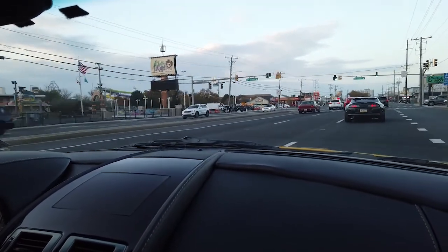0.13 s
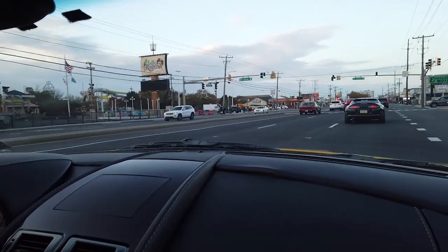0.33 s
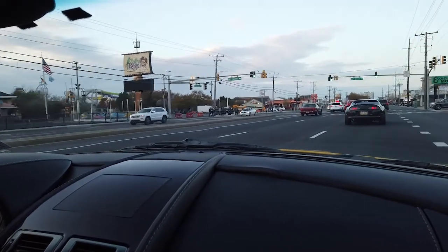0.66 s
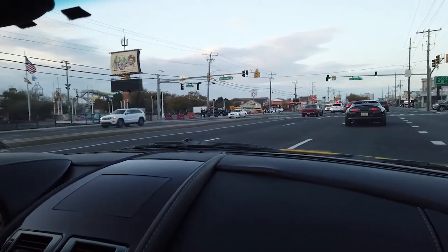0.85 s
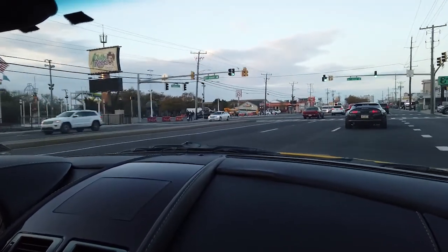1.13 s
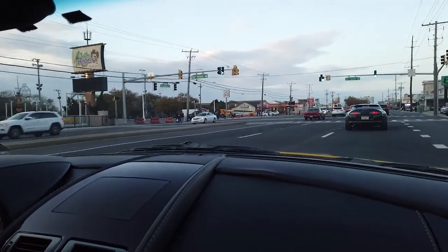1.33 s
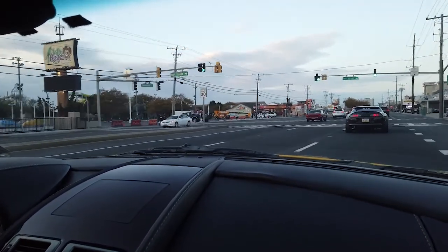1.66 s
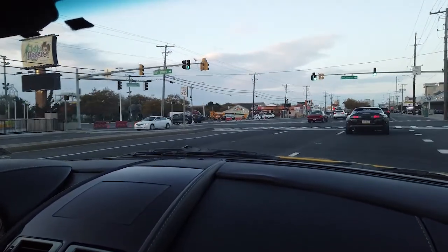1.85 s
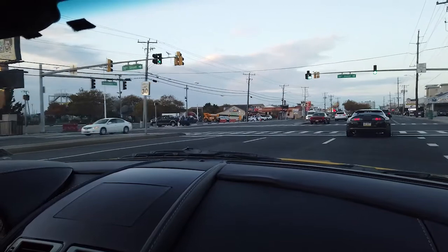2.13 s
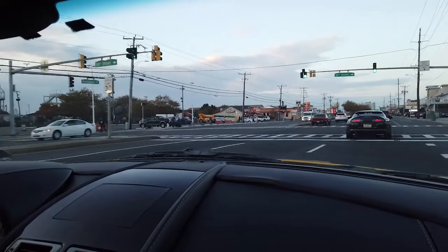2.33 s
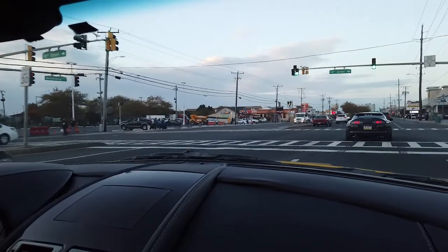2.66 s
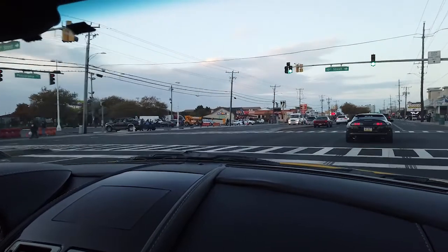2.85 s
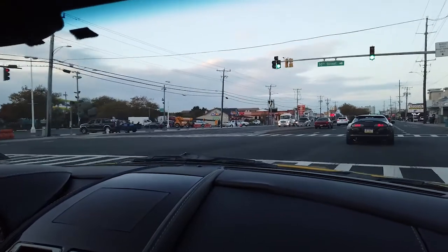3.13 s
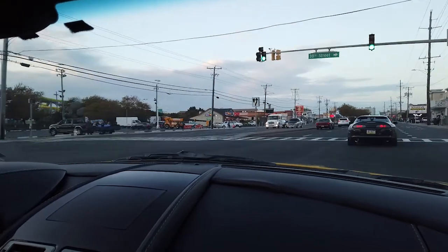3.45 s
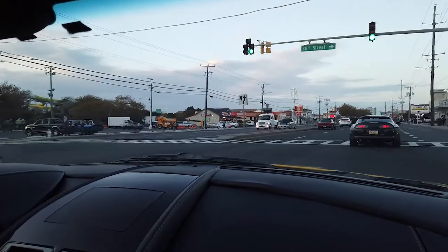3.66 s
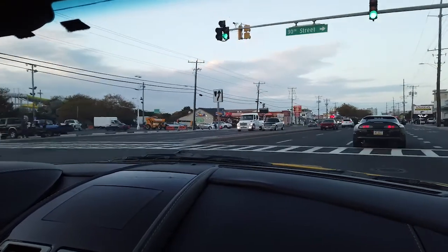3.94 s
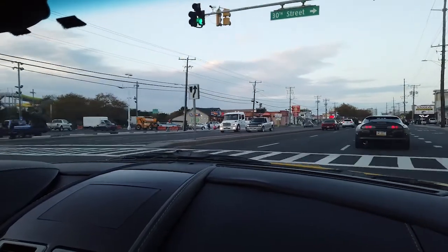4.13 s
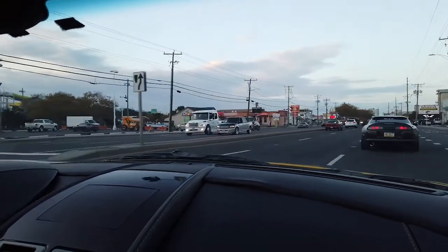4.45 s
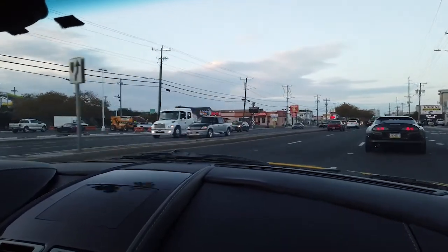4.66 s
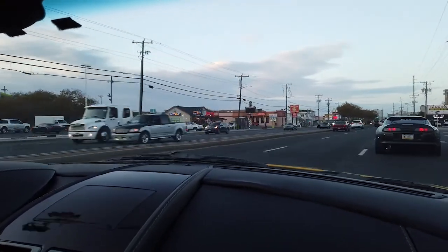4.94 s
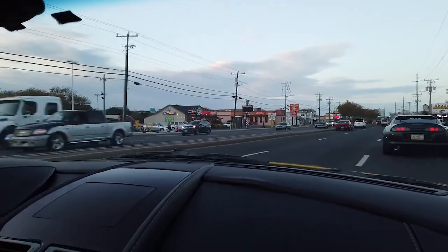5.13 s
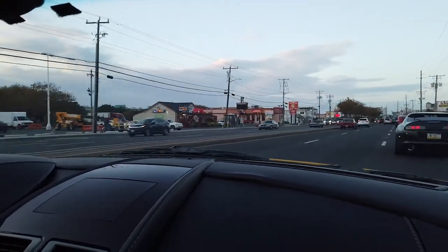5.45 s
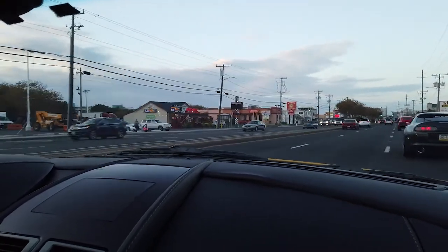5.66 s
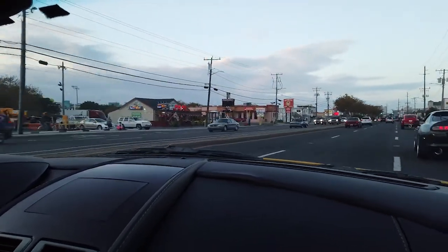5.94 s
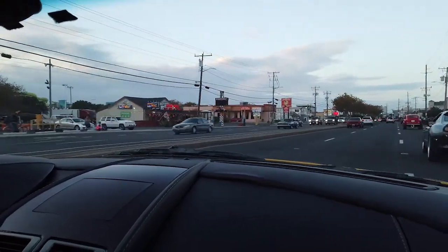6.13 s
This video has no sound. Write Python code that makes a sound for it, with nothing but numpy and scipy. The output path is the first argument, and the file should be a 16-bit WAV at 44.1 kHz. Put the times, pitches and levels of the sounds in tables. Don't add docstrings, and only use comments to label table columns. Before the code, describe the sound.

Inside a moving car, steady low road rumble and engine hum, with another car's exhaust droning ahead and body thumps over rough joints.

```python
import sys
import numpy as np
from scipy import signal
from scipy.fft import rfft, irfft, next_fast_len
from scipy.io import wavfile
from scipy.ndimage import uniform_filter1d

SR = 44100
rng = np.random.default_rng(int(sys.argv[2]) if len(sys.argv) > 2 else 0)


def unload_audio(sound):
    columns = np.transpose(np.atleast_2d(sound))
    steps = np.round(np.clip(columns, -1, 1) * 32767)
    wavfile.write(sys.argv[1], SR, steps.astype(np.int16))


def volts_from_decibels(level):
    exponent = np.asarray(level, float) / 20
    return 10 ** exponent


N = 277389
T = np.arange(N) / SR
SIZE = next_fast_len(N)
HZ = np.fft.rfftfreq(SIZE, 1 / SR)

# time_s, cycle_rate_hz
ENGINE_SPEED = [(0.0, 20.05), (2.1, 20.04), (2.8, 19.97), (3.3, 20.11), (3.6, 20.3), (4.2, 20.94),
                (4.8, 21.48), (5.4, 21.88), (6.29, 21.9)]
# time_s, load_above_cruising_db
ENGINE_LOAD = [(0, -3), (.5, -1), (3.0, -1), (3.6, 9), (4.2, 10), (5.1, 8.5), (5.8, 1.5), (6.29, -3)]
# order, level_db
ORDER_LEVELS = [(2, 5.5), (3, -0.5), (5, 1.5), (6, -9), (8, -0.5), (9, -5.5), (10, -13), (11, -4.5),
                (12, -15.5), (13, 0.5), (14, -9), (15, -5), (16, 1), (20, -11)]
REFERENCE_ORDERS = [5, 8, 11, 13, 16]
# cruising_db, load_share, speed_up_db_per_hz
ORDER_PATHS = [(-48.5, -1.7, -5), (-48, 1.18, -1), (-48.5, 1.4, -2.5), (-49.5, 1.27, -9), (-64, 0.83, 7.5)]

# time_s, firing_rate_hz
AHEAD_SPEED = [
    [(0.0, 152.2), (0.3, 152.4), (0.75, 150.3)],
    [(1.7, 139.9), (2.09, 142.6), (2.6, 142.2), (3.8, 142.8), (4.6, 143.7), (5.2, 144.0), (6.29, 144.96)],
]
# time_s, firing_tone_db, overtone_rasp_db
AHEAD_EFFORT = [
    [(0, -35.5, -3), (.25, -47.5, 1.5), (.5, -35.5, -14), (.62, -42.5, -6), (.75, -50, -10)],
    [(1.7, -49, 1), (1.95, -33, -5), (2.1, -26.5, 5), (2.45, -32, -4), (2.74, -26, -1), (2.88, -31, 7),
     (3.1, -31, 5), (3.35, -30.5, 2), (3.58, -26, -1), (4.05, -32, -3), (4.3, -29, -2), (4.45, -26.5, -2.5),
     (4.82, -27.5, 8), (5.1, -27.5, -10.5), (5.36, -32, 2), (5.85, -25.5, 3.5), (6.0, -25.5, -3),
     (6.2, -29, 6)],
]
SECOND_PARTIAL_DB = [-16.5, -31.5]
# time_s, level_db
THIRD_PARTIAL = [
    [(0, -49), (.1, -53), (.25, -51), (.4, -46), (.5, -49.5), (.62, -60), (.75, -73)],
    [(1.9, -70.5), (2.1, -45.5), (2.22, -56.5), (2.5, -52), (2.75, -67.5), (3.05, -47.5), (3.38, -58.5),
     (3.5, -47), (3.75, -51.5), (3.92, -61.5), (4.4, -60), (4.75, -51), (4.97, -65), (5.12, -52.5),
     (5.45, -51), (5.62, -59), (5.85, -46.5), (6.0, -54), (6.15, -45)],
]
FOURTH_PARTIAL = [
    [(0, -54), (.2, -54.5), (.45, -51.5), (.56, -55), (.64, -68)],
    [(1.75, -65), (2.15, -50), (2.3, -60), (2.4, -48.5), (2.58, -55), (2.75, -47), (2.92, -54),
     (3.1, -53.5), (3.2, -45), (3.38, -58), (3.5, -52.5), (4.08, -51), (4.2, -56.5), (4.8, -49.5),
     (5.2, -55), (5.32, -60), (5.8, -46.5), (6.29, -50.5)],
]

# time_s, unevenness_db, coarseness_db
ROAD_SURFACE = [(0, -2, -1), (.6, -3.5, 0), (1.2, -0.5, 1), (1.7, -3.5, 0), (2.3, 1.5, 2), (2.6, -4.5, 2),
                (3.0, 1, 1.5), (3.4, -0.5, 2), (3.7, 5.5, -2), (4.0, 12.5, -3.5), (4.2, 0, -3.5),
                (4.45, -4.5, -2), (4.7, 8.5, -1.5), (5.1, 0.5, -1.5), (5.5, -3.5, -0.5), (5.9, -4, -1.5),
                (6.29, -3.5, -1.5)]
ROAD_PARTS_HZ = [45, 110, 400, 850, 1700, 3600]
# frequency_hz, level_db_per_hz
CABIN_COLOUR = [(12, -2), (24, 3.5), (42, 7.5), (68, -11), (105, -10.5), (200, -19), (310, -24),
                (500, -29.5), (830, -28), (1150, -37), (1450, -36.5), (2100, -41.5), (3500, -56.5),
                (5200, -65.5)]
# centre_hz, width_hz, lift_db
ROAR_PANELS = [(750, 20, 5.5), (842, 28, 4), (938, 30, 6.5), (1434, 110, 5), (2100, 18, 1), (2710, 49, 3.5)]
# frequency_hz, side_minus_mid_db
FIELD_WIDTH = [(40, -38), (90, -31), (220, -14.5), (340, -17), (520, -24), (800, -13), (1900, -14),
               (3000, 0), (6000, -9)]
# time_s, roar_lift_db
TYRE_SLAPS = [
    (2.199, 0),
    (2.519, 2),
    (3.25, 2),
    (4.585, 7),
    (4.745, 8.5),
]

# start_s, peak_db, body_hz, t60_s
ROAD_JOINTS = [(.11, -24, 40.8, 0.25), (.805, -26, 40, 0.29), (1.195, -26.5, 45, 0.27),
               (1.69, -26.5, 45, 0.24), (2.21, -27, 49, 0.18), (2.287, -20.5, 45, 0.29),
               (2.409, -25.5, 45.8, 0.34), (2.954, -24, 45, 0.28), (3.04, -27, 47.7, 0.23),
               (3.183, -24.5, 50.5, .2), (3.548, -19, 42.4, 0.26), (3.716, -13.5, 51, 0.36),
               (3.835, -19, 55, .2), (3.91, -17.5, 32, .3), (3.95, -15.5, 36, .25),
               (3.991, -13.5, 48, 0.19), (4.05, -14.5, 45.6, .25), (4.435, -20.5, 42, .25),
               (4.583, -11.5, 44.4, 0.53), (4.705, -26, 48, 0.22), (4.768, -14.5, 42, 0.19),
               (4.845, -27.5, 45, 0.14), (5.025, -19, 43.3, .3), (5.434, -28, 39.9, 0.26),
               (5.731, -24, 43.8, .15), (5.9, -19.5, 42.8, 0.34), (6.09, -21, 42, 0.24),
               (6.175, -19.5, 38.3, 0.14)]
# start_s, peak_db, pitch_hz
PANEL_KNOCKS = [(0.88, -34.5, 922), (1.134, -32, 745), (1.232, -37, 830), (1.257, -37, 790),
                (1.343, -33, 851), (2.157, -37, 743), (2.197, -31, 842), (2.347, -31, 860),
                (2.405, -33, 850), (2.511, -36, 763), (2.523, -28.5, 834), (2.546, -31, 936),
                (2.56, -31, 923), (2.58, -30.5, 840), (2.613, -34.5, 796), (2.663, -32, 908),
                (2.701, -35.5, 892), (2.744, -39.5, 786), (2.767, -43.5, 821), (2.806, -32, 835),
                (2.861, -38.5, 912), (2.903, -42, 930), (3.179, -40, 857), (3.216, -31.5, 734),
                (3.262, -37, 814), (3.304, -37, 704), (3.354, -36, 742), (4.584, -37.5, 860),
                (4.708, -36.5, 743), (4.737, -26.5, 725)]
# centre_s, peak_db,
# pitch_hz, length_s
SHORT_TONES = [(.38, -50, 770, .3), (2.08, -47, 856, .2), (0.57, -47, 435, .06), (2.18, -48, 395, .11),
               (3.19, -41, 580, .03), (3.24, -42, 620, .025), (3.32, -44, 600, .02),
               (3.445, -45, 880, .025), (3.815, -47.5, 1450, .066), (4.552, -45, 900, .012),
               (4.572, -41, 1310, .018), (4.59, -47, 1500, .012), (4.61, -38, 225, .12),
               (4.785, -44, 920, .015), (4.78, -43, 550, .02), (5.533, -50.5, 1450, .05),
               (5.657, -59, 3020, .017), (5.69, -60, 3320, .024), (5.86, -59, 3450, .02),
               (5.994, -49, 1450, .05)]
# time_s, level_db
CREAK_LEVEL = [(0, -85.5), (4.9, -87.5), (5.3, -78.5), (5.65, -71), (6.05, -69), (6.29, -67)]
# peak_s, peak_db, rise_s, t60_s, dull_share
TRIM_TICKS = [(2.127, -56, 0.0017, .05, 0.1), (2.906, -59.5, 0.0034, .04, .9),
              (2.915, -46.5, 0.004, 0.05, 0.97), (2.921, -55.5, .003, 0.03, 0.98),
              (3.032, -61.5, 0.0098, .06, .1), (3.041, -40.5, 0.002, 0.044, 0.1), (3.05, -55, .003, .1, .1),
              (3.075, -63, 0.0092, 0.13, 0.2), (3.323, -70.5, 0.0022, 0.046, 1),
              (3.719, -63, 0.0024, .05, 0.9), (4.381, -62, 0.0016, 0.068, 0.7),
              (4.716, -68.5, .002, 0.078, 0.8), (5.022, -61, 0.012, 0.13, 0.03),
              (5.035, -44, .0025, .035, .05), (5.04, -48, 0.0033, 0.082, .05),
              (5.052, -56, 0.0036, .16, .05), (5.64, -74, 0.048, 0.25, 0.2), (5.94, -72, .03, 0.25, 0.04)]
# centre_hz, width_hz, level_db
BRIGHT_MODES = [(1900, 1700, 2), (4150, 700, -4.5), (5100, 560, -6.5), (6130, 890, -0.5), (7400, 1500, -5),
                (8800, 880, 0.5), (10500, 910, 4.5), (12730, 1400, -2.5), (15000, 1400, -2)]
DULL_MODES = [(3500, 250, 4.5), (4140, 510, 0.5), (5900, 500, -5), (7500, 350, -2.5), (9700, 400, 2.5),
              (10700, 360, -1.5), (11500, 350, 0.5)]
CLOTH_MODES = [(4470, 2500, -8), (7930, 2700, -5.5), (10340, 900, 3.5), (12760, 1500, -3),
               (14800, 2000, -1.5)]
# time_s, level_db
AIR_LEVEL = [(0.0, -75), (1.4, -77.5), (3.24, -79.5), (3.9, -81.5), (5.1, -82), (5.73, -76.5), (6.29, -78)]
# frequency_hz, level_db_per_hz
AIR_COLOUR = [(3500, -7), (5000, 2), (6500, -3.5), (8500, -5), (9700, -7.5), (11400, -6.5), (12300, -12),
              (13200, -17), (16000, -28)]


def shape(points, hz):
    f, db = np.transpose(points)
    return np.interp(np.log(np.maximum(hz, 1)), np.log(f), db)


def colour(x, gain):
    return irfft(rfft(x, SIZE) * gain, SIZE)[:N]


def unit(x):
    return x / np.sqrt(np.mean(x ** 2))


def walk(rate):
    steps = np.repeat(rng.standard_normal(int(N * rate / SR) + 2), 16)
    smooth = uniform_filter1d(uniform_filter1d(steps, size=16), size=16)
    return 1.65 * np.interp(T * rate * 16, np.arange(len(smooth)), smooth)


def curves(table):
    time_s, *columns = np.transpose(table)
    return [np.interp(T, time_s, column) for column in columns]


def between(x, marks):
    steps = np.arange(len(marks))
    return np.clip(1 - np.abs(np.interp(x, marks, steps) - steps), 0, 1)


def resonances(modes):
    return sum(volts_from_decibels(db) / (1 + (2 * (HZ - hz) / width) ** 2) for hz, width, db in modes)


def ports(x, lag_s):
    turn = np.exp(1j * np.pi * HZ * lag_s)
    return np.array([colour(x, turn), colour(x, 1 / turn)])


def partial(phase, db, shimmer_db, rough):
    level = volts_from_decibels(db + shimmer_db * walk(14))
    start = 2 * np.pi * rng.random()
    return np.sqrt(2) * level * np.sin(phase + rough * walk(22) + start)


def engine():
    cruise_hz = 20
    hz, load = curves(ENGINE_SPEED)[0], curves(ENGINE_LOAD)[0]
    reference_db = np.array([db + share * load + slope * (hz - cruise_hz) for db, share, slope in ORDER_PATHS])
    phase = 2 * np.pi * np.cumsum(hz) / SR
    out = 0
    for order, db in ORDER_LEVELS:
        order = round(order)
        level_db = between(order, REFERENCE_ORDERS) @ reference_db + db
        out = out + partial(order * phase, level_db, shimmer_db=2.6, rough=.4)
    return out


def car_ahead():
    fade_s = .05
    out = 0
    pulls = zip(AHEAD_SPEED, AHEAD_EFFORT, SECOND_PARTIAL_DB, THIRD_PARTIAL, FOURTH_PARTIAL)
    for speed, effort, second_db, third, fourth in pulls:
        tone, rasp = curves(effort)
        levels = [tone, tone + rasp + second_db, curves(third)[0], curves(fourth)[0]]
        phase = 2 * np.pi * np.cumsum(curves(speed)[0]) / SR
        since_start = T - speed[0][0] + fade_s
        until_end = speed[-1][0] + fade_s - T
        on = np.clip(np.minimum(since_start, until_end) / fade_s, 0, 1)
        for k, db in enumerate(levels):
            out = out + on * partial((k + 1) * phase, db, shimmer_db=.6 + .3 * k, rough=.14 + .22 * k)
    return out


def road():
    slap_s, shakes_per_s = .03, 21
    uneven, coarse = curves(ROAD_SURFACE)
    slaps = sum(db * np.exp(-((T - s) / slap_s) ** 2) for s, db in TYRE_SLAPS)
    boom = -3.5 + .45 * uneven + 2 * walk(shakes_per_s)
    drum = 0.82 * uneven + 1.5 * walk(shakes_per_s)
    roar = coarse + slaps + 0.5 * walk(shakes_per_s)
    hiss = coarse
    below_roar = 0.16 * drum + 0.13 * roar
    above_roar = 0.3 * roar + 0.28 * hiss
    swing = np.array([boom, drum, below_roar, roar, above_roar, hiss])

    panels_db = sum(db / (1 + (2 * (HZ - hz) / width) ** 2) for hz, width, db in ROAR_PANELS)
    treble_loss_db = 35 * np.log10(1 + (HZ / 7000) ** 4)
    gain = volts_from_decibels(shape(CABIN_COLOUR, HZ) + panels_db - treble_loss_db)
    mid, side = rfft(rng.standard_normal((2, SIZE))) * gain
    out = 0
    for centre in 14 * 2 ** np.arange(0, 10, .5):
        octaves = np.log2(np.maximum(HZ, 1) / centre)
        band = np.cos(np.pi * np.clip(octaves, -.5, .5)) ** 2
        share = between(np.log(centre), np.log(ROAD_PARTS_HZ))
        level = volts_from_decibels(share @ swing + 0.61 * walk(9))
        pair = np.array([mid, side * volts_from_decibels(shape(FIELD_WIDTH, centre))])
        out = out + level * irfft(band * pair, SIZE)[:, :N]
    return volts_from_decibels(-29.0) * out / np.sqrt(np.mean(out[0] ** 2))


def joints():
    out = np.zeros(N)
    for s, db, hz, t60 in ROAD_JOINTS:
        t = np.maximum(T - s, 0)
        swell = 1 - np.exp(-t / 0.0017)
        out += volts_from_decibels(db - 60 * t / t60) * swell * np.sin(2 * np.pi * hz * t)
    return out


def knocks():
    rise_s, t60_s = .005, .05
    wobble, out = .8 * walk(90), np.zeros(N)
    for s, db, hz in PANEL_KNOCKS:
        near = slice(int(s * SR), int((s + t60_s) * SR))
        t = T[near] - T[near.start]
        envelope = volts_from_decibels(db + 0.5 - 60 * t / t60_s) * np.minimum(t / rise_s, 1) ** 2
        out[near] += envelope * np.sin(2 * np.pi * hz * t + wobble[near])
    return out


def rings():
    wobble, out = .7 * walk(70), np.zeros(N)
    for s, db, hz, length in SHORT_TONES:
        near = slice(max(int((s - 2 * length) * SR), 0), int((s + 2 * length) * SR))
        t = T[near]
        envelope = volts_from_decibels(db) * np.exp(-(2.9 * (t - s) / length) ** 2)
        out[near] += envelope * np.sin(2 * np.pi * hz * t + wobble[near])
    return out


def flecks(hz, width, rate, spread_db):
    ring = colour(rng.standard_normal(N), 1 / (1 + (2 * (HZ - hz) / width) ** 2))
    return unit(ring * volts_from_decibels(spread_db * walk(rate)))


def creak():
    low = 0.96 * flecks(3150, 350, 60, 2.4)
    middle = flecks(3550, 400, 60, 2.3)
    high = 0.48 * flecks(4050, 900, 70, 3.4)
    return volts_from_decibels(curves(CREAK_LEVEL)[0]) * (low + middle + high)


def ticks():
    shared = ports(rng.standard_normal(N), 3e-5)

    def grain(modes):
        gain = resonances(modes)
        return np.array([unit(colour(port + 0.54 * rng.standard_normal(N), gain)) for port in shared])

    bright, dull = grain(BRIGHT_MODES), grain(DULL_MODES)
    out = np.zeros((2, N))
    for s, db, rise, t60, share in TRIM_TICKS:
        share = np.clip(share, 0, 1)
        attack = np.exp(-((T - s) / rise) ** 2)
        decay = volts_from_decibels(-60 * np.maximum(T - s, 0) / t60)
        envelope = np.where(T < s, attack, decay)
        out += volts_from_decibels(db - 2.0) * envelope * ((1 - share) * bright + share * dull)
    return out


def brush():
    centre_s, length_s, level_db = 6.196, .058, -66
    gain = resonances(CLOTH_MODES)
    hiss = np.array([unit(colour(rng.standard_normal(N), gain)) for _ in range(2)])
    swell = np.exp(-((T - centre_s) / length_s) ** 4)
    return volts_from_decibels(level_db) * swell * (hiss + 0.66 * hiss[::-1])


def air():
    low_cut = np.sqrt(1 + (4000 / np.maximum(HZ, 1)) ** 8)
    gain = volts_from_decibels(shape(AIR_COLOUR, HZ)) / low_cut
    shared, left, right = (unit(colour(rng.standard_normal(N), gain)) for _ in range(3))
    both = ports(shared, 7e-5) + 1.65 * np.array([left, right])
    buzz = volts_from_decibels(-1.5) * ports(flecks(10500, 800, 60, 2.8), 2.5e-5)
    flicker = volts_from_decibels(1.1 * walk(10.0))
    return volts_from_decibels(curves(AIR_LEVEL)[0] - 5.0) * (flicker * both + buzz)


def scene():
    mid, side = road()
    tones = engine() + car_ahead()
    late_tones = colour(np.roll(tones, 90), np.minimum(HZ / 150, 2.5))
    smear = volts_from_decibels(-23.5) * late_tones * (1 + 0.44 * walk(3.5))
    near = ports(mid + tones + joints() + rings() + knocks() + creak(), 2.8e-5)
    return near + ticks() + brush() + air() + (side + smear) * np.array([[1], [-1]])


def band_limit(x):
    return signal.sosfilt(signal.butter(12, 15750, fs=SR, output="sos"), x)


def record(dry):
    return band_limit(dry)


dry = scene()
out = record(dry)
unload_audio(out)
```